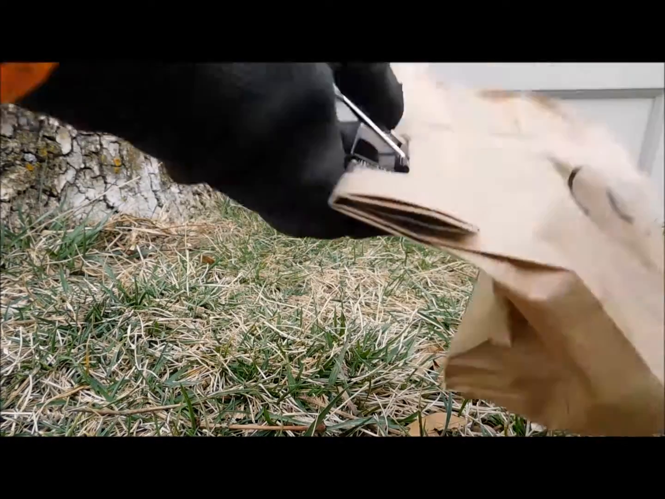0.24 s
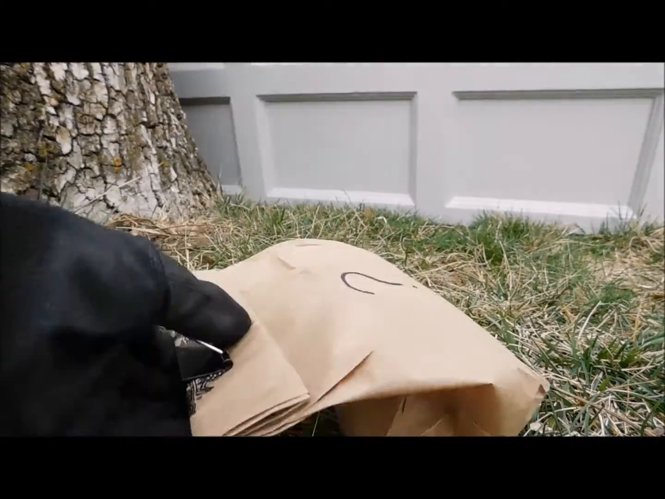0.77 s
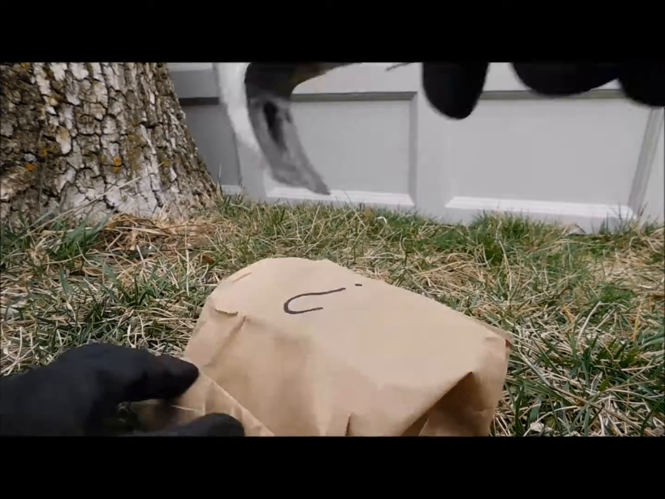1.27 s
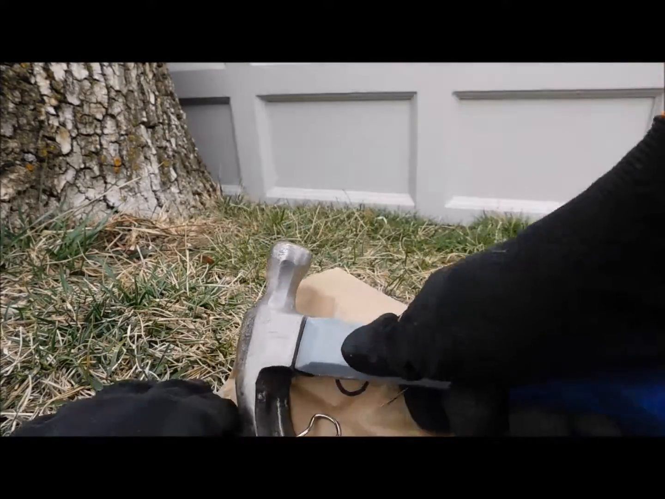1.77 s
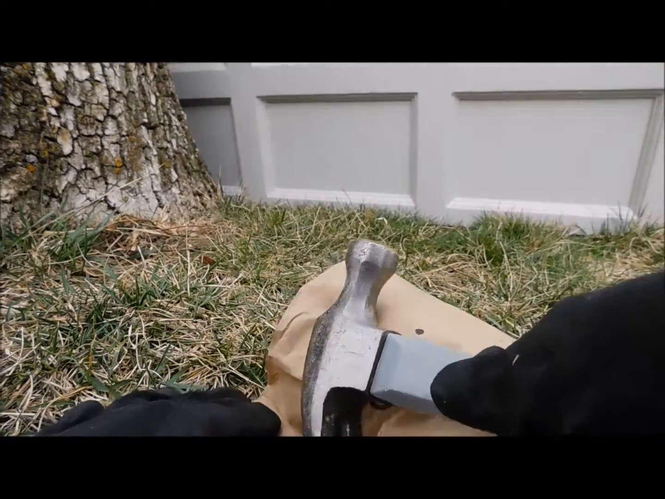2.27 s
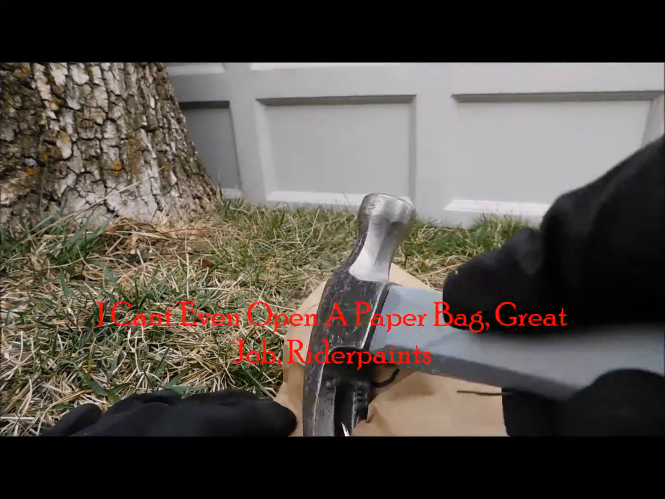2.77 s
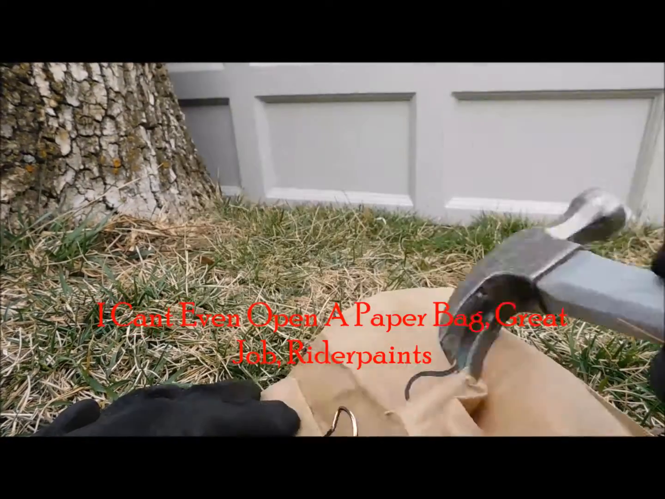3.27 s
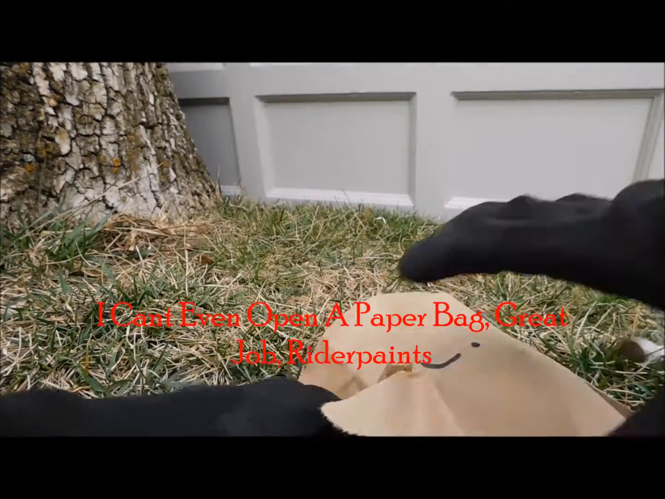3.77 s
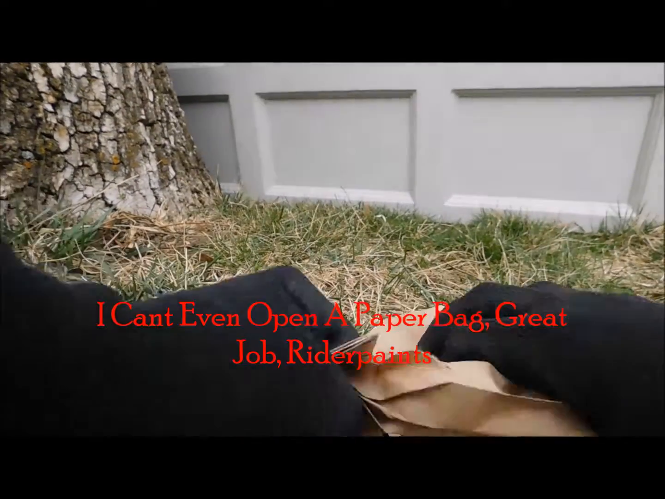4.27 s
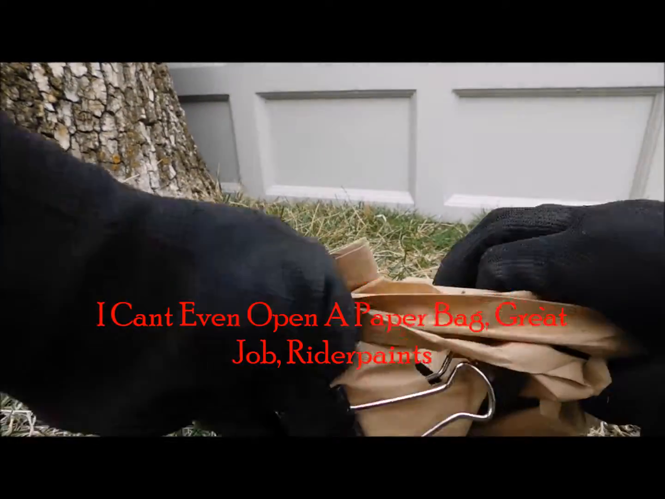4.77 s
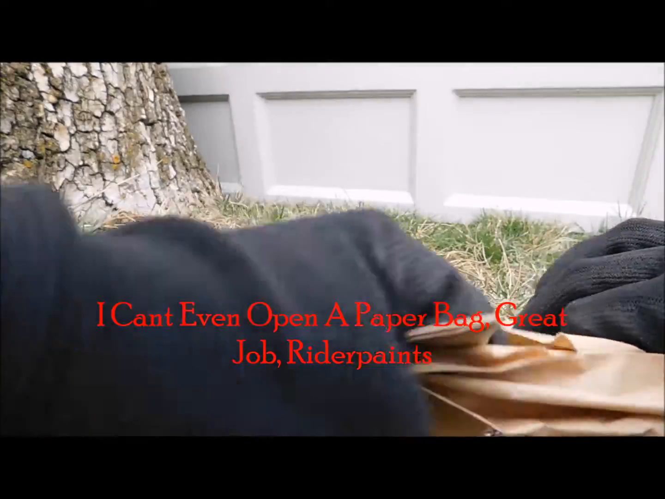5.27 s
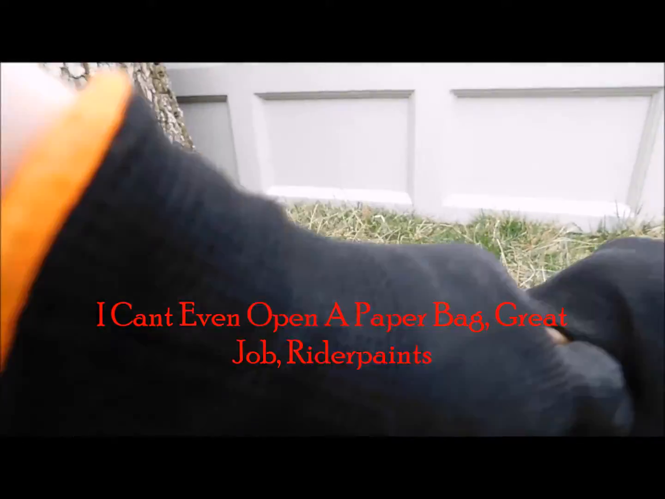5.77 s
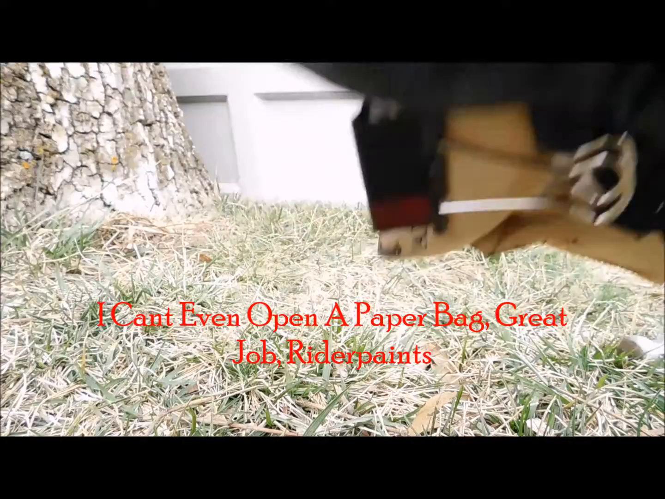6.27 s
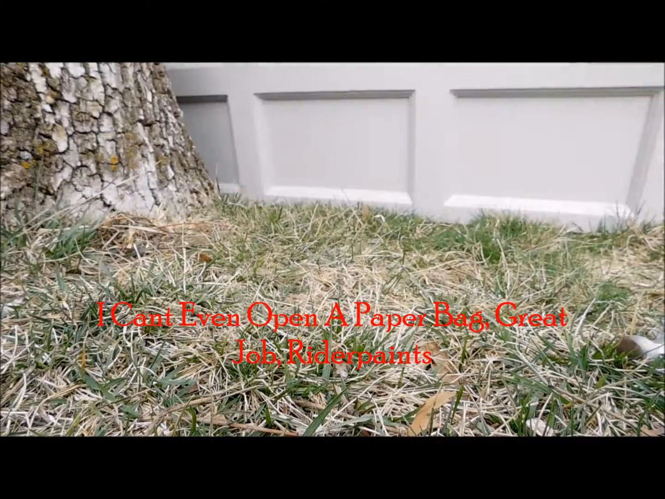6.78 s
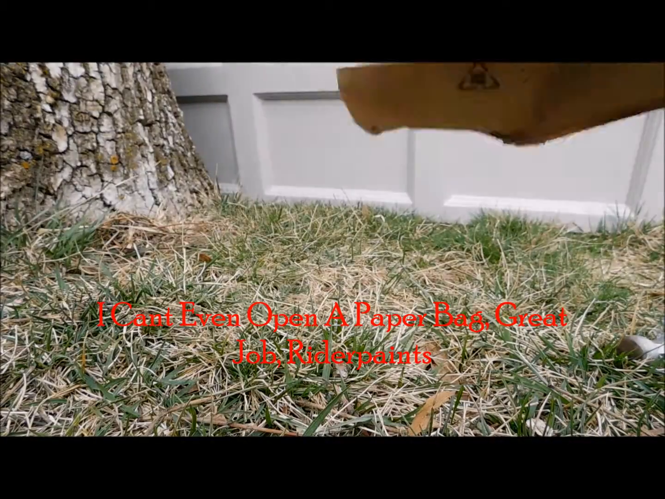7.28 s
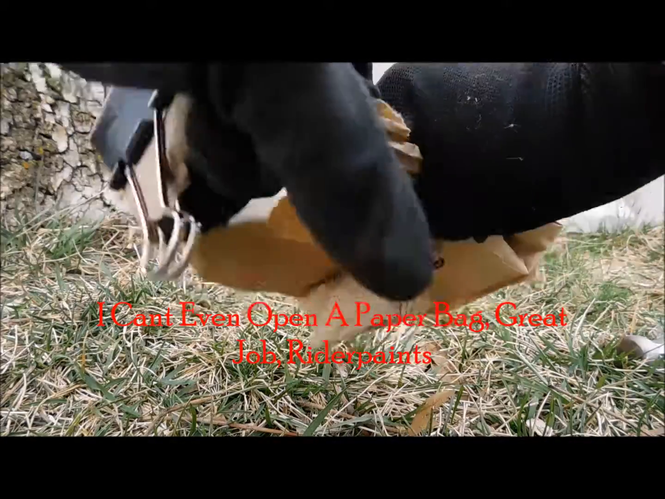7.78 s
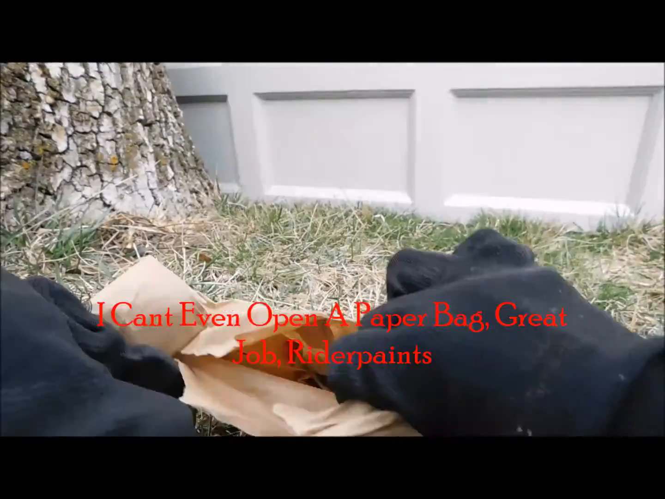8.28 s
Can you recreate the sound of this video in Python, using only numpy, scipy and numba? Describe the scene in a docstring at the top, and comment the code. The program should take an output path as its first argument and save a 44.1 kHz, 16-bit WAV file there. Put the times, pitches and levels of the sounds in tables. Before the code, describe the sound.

Dry, irregular paper crackle dominates, recorded very near and outdoors. Brief bursts of rustling and creasing come with clear panel snaps, fibre ticks and dull low thumps from the bag's walls. It is strongest during the hammer pulls, thins to light fumbling mid-way, nearly stops, then becomes loud and snappy again. Faint hiss and occasional soft wind rumble sit underneath, and the bag sits slightly right of centre.

```python
"""A stiff paper bag on a lawn is crumpled, pulled and torn by gloved hands and a hammer claw.
Dense crackle is many small random creases plus rubbing noise; clear snaps are timed panel rings,
rattles and fibre ticks; popping or knocked walls thump.
Light wind is low-passed noise rumbling on two microphone ports of a small camera; the yard and
microphone add steady hiss."""
import sys
import numpy as np
from scipy import signal
from scipy.fft import rfft, irfft, next_fast_len
from scipy.io import wavfile
from scipy.ndimage import uniform_filter1d, map_coordinates
from numba import njit

SR = 44100
rng = np.random.default_rng(int(sys.argv[2]) if len(sys.argv) > 2 else 0)


def store_pcm(level_fs):
    """Save levels as 16-bit WAV."""
    pcm = np.round(np.clip(level_fs, -1, 1) * 32767).astype(np.int16)
    wavfile.write(sys.argv[1], SR, np.atleast_2d(pcm).T)


N = 376173


def gain_of(db):
    """Decibels to amplitude gain."""
    return 10 ** (np.asarray(db) / 20)


def evened(x):
    """Scales to rms 1."""
    return x / np.sqrt(np.mean(x ** 2) + 1e-20)


def read(points, hz):
    """Interpolates a spectrum table on a log frequency axis."""
    f, value = np.transpose(points)
    return np.interp(np.log(hz + 1), np.log(f + 1), value)


def follow(table):
    """One value per sample for each column of a time table."""
    s, *columns = np.transpose(table)
    return [np.interp(np.arange(N) / SR, s, c) for c in columns]


def colour(x, points):
    """Minimum-phase filter with the given spectrum shape, scaled to energy 1."""
    log_gain = np.log(gain_of(read(points, abs(np.fft.fftfreq(4096, 1 / SR)))))
    response = np.exp(np.conj(signal.hilbert(log_gain)))
    taps = np.fft.ifft(response).real[:2048]
    taps = taps / np.linalg.norm(taps)
    return signal.oaconvolve(x, taps[None], axes=1)[:, :x.shape[1]]


def drift(per_s):
    """Twice-averaged noise: a slow random drift, rms 1."""
    width = max(round(SR / per_s), 1)
    return evened(uniform_filter1d(uniform_filter1d(rng.standard_normal(N), width), width))


EDGE_DB, ROUNDNESS = -10, 1.9  # level at start and end re peak; shape: 1 pointed, 2 rounded


def swells(rows, rest, step=64):
    """Sums swell powers over a resting level; further columns blend by each swell's share of power."""
    t = np.arange(0, N, step) / SR
    rows = np.array(rows)
    start, peak, end, level_db = rows[:, :4].T[:, :, None]
    away = np.where(t < peak, (peak - t) / (peak - start), (t - peak) / (end - peak))
    swell_db = level_db + EDGE_DB * abs(away) ** ROUNDNESS
    power = gain_of(2 * np.vstack([swell_db, rest[0] + 0 * t]))
    total = power.sum(0)
    blends = np.vstack([rows[:, 4:], rest[1:]]).T @ power / total
    return [np.interp(np.arange(N) / SR, t, c) for c in [10 * np.log10(total), *blends]]


def burst(t60_s, rise_s=0.00014):
    """Two draws of a decaying puff of noise, energy 1 each."""
    t = np.arange(1024) / SR
    x = rng.standard_normal((2, 1024)) * gain_of(-60 * t / t60_s) * (1 - np.exp(-t / rise_s))
    return x / np.linalg.norm(x, axis=1, keepdims=True)


def panel(hz, cycles, rise_s=0.00019, loss_per_s=250):
    """A buckling paper panel rings as a damped sine, energy 1."""
    t = np.arange(1024) / SR
    decay = np.exp(-t * (hz / cycles + loss_per_s))
    x = np.sin(2 * np.pi * hz * t) * decay * (1 - np.exp(-(t / rise_s) ** 2))
    return x / np.linalg.norm(x)


@njit
def add(mix, size, at, sound):
    """Adds the sound at each given sample, scaled by its size."""
    for i in at:
        n = min(sound.shape[1], mix.shape[1] - i)
        for c in range(2):
            for j in range(n):
                mix[c, i + j] += size[i] * sound[c, j]


LARGE_DB, LARGE_DB_PER_OCTAVE = 5.5, -9  # large-panel boost at typical ring 1500 Hz; slope with ring


def folded(x, typical_hz, patchy_db=1.5, large_hz=1000):
    """The bag's shape colours its sound: large panels lift the lows, random resonances drift."""
    hz, t, z = signal.stft(x, SR, nperseg=256, noverlap=192)
    typical_hz = typical_hz[np.minimum((t * SR).astype(int), N - 1)]
    large_db = LARGE_DB + LARGE_DB_PER_OCTAVE * np.log2(typical_hz / 1500)
    patches = rng.standard_normal(z.shape[1:])
    patches = uniform_filter1d(patches, size=2, axis=0)
    patches = evened(uniform_filter1d(patches, size=80, axis=1))
    large = 1 / (1 + (hz[:, None] / large_hz) ** 4)
    z = z * gain_of(patchy_db * patches + large_db * large)
    return signal.istft(z, SR, nperseg=256, noverlap=192)[1][:, :N]


# squeezes, pulls, folds: (start [s], peak [s], end [s], crackle level [dB], treble re body [dB])
MOVES = [(-0.089, 0.0, 0.22, -40, -9), (0.08, 0.093, 0.136, -31.5, -4.5), (0.13, 0.17, 0.211, -26, -2),
         (0.166, 0.242, 0.258, -27.5, -9), (0.286, 0.346, 0.372, -31, -4), (0.355, 0.413, 0.5, -30, -8.5),
         (0.563, 0.658, 0.679, -36, -9), (0.825, 0.858, 0.885, -34, -2.5), (0.776, 0.932, 0.987, -41, -9),
         (0.988, 1.039, 1.098, -39.5, -12), (1.17, 1.238, 1.3, -40.5, -8), (1.318, 1.34, 1.371, -28, -9),
         (1.37, 1.4, 1.44, -31, -4.5), (1.44, 1.495, 1.561, -24.5, -9.5), (1.45, 1.601, 1.644, -38.5, -16),
         (1.697, 1.794, 1.871, -28.5, -9.5), (1.929, 1.984, 2.023, -26.5, -6),
         (2.045, 2.117, 2.161, -22, -3.5), (2.213, 2.244, 2.281, -34.5, -8),
         (2.321, 2.356, 2.39, -29, -4.5), (2.427, 2.445, 2.512, -32, -1.5),
         (2.494, 2.568, 2.607, -26.5, -4), (2.472, 2.674, 2.748, -35.5, -6.5),
         (2.824, 2.89, 2.918, -30.5, -6.5), (2.972, 3.015, 3.072, -20, -6), (3.15, 3.213, 3.299, -24.5, 1),
         (3.336, 3.365, 3.415, -24, -4), (3.62, 3.655, 3.697, -38.5, -8), (3.72, 3.79, 3.894, -45, 0),
         (3.898, 3.921, 3.953, -27.5, -6.5), (3.94, 4.01, 4.31, -35.5, -6.5),
         (4.135, 4.17, 4.217, -26.5, -8), (4.211, 4.26, 4.313, -29.5, -4), (4.306, 4.345, 4.387, -29, -7.5),
         (4.414, 4.433, 4.48, -28.5, -2.5), (4.481, 4.58, 4.653, -31.5, -8.5),
         (4.667, 4.73, 4.82, -37.5, -4.5), (4.848, 4.887, 5.012, -34.5, -2), (4.9, 5.06, 5.13, -32.5, -1),
         (5.161, 5.181, 5.203, -34.5, -0.5), (5.23, 5.38, 5.459, -34, -4.5),
         (5.43, 5.487, 5.543, -32, -2.5), (5.57, 5.632, 5.646, -36, -4.5), (5.709, 5.803, 5.815, -31.5, -9),
         (5.602, 5.902, 5.97, -31, -3), (6.132, 6.215, 6.235, -47.5, -25),
         (6.258, 6.292, 6.329, -33.5, -14), (6.345, 6.372, 6.389, -40, -19),
         (6.404, 6.432, 6.455, -38.5, -12), (6.479, 6.513, 6.552, -34, -4.5),
         (6.605, 6.66, 6.678, -35.5, -8), (6.679, 6.691, 6.736, -37, -6), (6.805, 6.865, 6.94, -21.5, -2.5),
         (7.04, 7.093, 7.189, -27.5, -3), (7.288, 7.335, 7.398, -21.5, -3.5), (7.41, 7.434, 7.482, -30, -7),
         (7.515, 7.572, 7.638, -27, -6), (7.65, 7.672, 7.73, -27.5, -2.5), (7.817, 7.829, 7.848, -24.5, -7),
         (7.61, 7.8, 7.998, -33, -7), (8.002, 8.03, 8.122, -26, -8.5), (8.149, 8.242, 8.26, -34, -2.5),
         (8.383, 8.411, 8.45, -23.5, -1.5), (8.265, 8.47, 8.77, -30.5, -4)]
# hands lying on the bag between moves: (level [dB], treble re body [dB])
HANDS_AT_REST = (-48.5, -7)
# panels shrink as the bag is crushed, grow as it is opened: (time [s], typical ring [Hz])
PANEL_RINGS = [(0.0, 1762), (0.6, 1473), (1.55, 1403), (1.95, 1761), (2.85, 1842), (3.05, 2427),
               (3.9, 1862), (4.6, 1722), (5.1, 1869), (5.85, 1594), (6.2, 2070), (6.85, 2494), (7.35, 2082),
               (7.7, 2464), (8.03, 1445), (8.53, 1710)]
# paper panels: (frequency [Hz], level [dB])
BODY_SPECTRUM = [(150, -30.5), (400, -13.5), (800, -4), (1300, -3.5), (2500, -1.5), (4000, -5.5),
                 (6000, -20.5), (9000, -35)]
# breaking fibres: (frequency [Hz], level [dB])
FIBRE_SPECTRUM = [(2500, -26), (4500, 2.5), (6000, 0), (10000, -2), (14000, -3), (17000, -12.5)]
# whole walls of the bag: (frequency [Hz], level [dB])
WALL_SPECTRUM = [(80, -16.5), (150, -3.5), (300, 0.5), (500, -7), (800, -18.5)]
# wall boom: level for a -36 dB move at 1500 Hz ring; share of the move's dB; slope with ring
BOOM_DB, BOOM_FOLLOW, BOOM_DB_PER_OCTAVE = -49, 0.73, -6.5


def crackle(count=24):
    """Small creases give way in clumps, more often under harder handling; each kind rings its panel."""
    level_db, crisp_db = swells(MOVES, HANDS_AT_REST)
    typical_hz, = follow(PANEL_RINGS)
    per_s = 900 * gain_of(.55 * (level_db + 34.5) + 4.0 * drift(60))
    chance, tail = rng.random((2, N))
    size = gain_of(5.14 * np.minimum(-np.log(tail + 1e-9), 3.3)) * (chance < per_s / SR)
    # offset the power gained from denser creases
    size = evened(size / np.sqrt(uniform_filter1d(per_s, round(0.09 * SR))))
    size_crisp = size * gain_of(4.5 * rng.standard_normal(N))  # some break fibres, others only bend

    rings_hz = np.geomspace(450, 4200, count)
    wanted_hz = typical_hz * 2 ** (.9 * rng.standard_normal(N))
    kind = np.clip(np.searchsorted(rings_hz, wanted_hz), 0, count - 1)
    body, crisp, boom = np.zeros((3, 2, N))
    for k, hz in enumerate(rings_hz):
        t60_s = rng.uniform(0.002, 0.024)
        side = (-1) ** k * 0.18
        ring = 0.54 * panel(hz, 2.9) * [[1], [side]] + 0.95 * burst(t60_s)
        at = np.flatnonzero((size > 0) & (kind == k))
        add(body, size, at, ring)
        add(crisp, size_crisp, at, burst(.3 * t60_s))
        add(boom, size, at, burst(5 * t60_s, 0.0008))

    # gloves and paper sliding
    rub = gain_of(-2.5 + 5.05 * drift(45)) * rng.standard_normal((2, 2, N))
    body = folded(colour(evened(body) + rub[0], BODY_SPECTRUM), typical_hz)
    crisp = colour(evened(crisp) + gain_of(-2.5) * rub[1], FIBRE_SPECTRUM)
    boom = colour(boom, WALL_SPECTRUM)
    boom_db = BOOM_DB + BOOM_FOLLOW * (level_db + 36.0)
    boom_db = boom_db + BOOM_DB_PER_OCTAVE * np.log2(typical_hz / 1500)
    body = gain_of(level_db) * evened(body)
    crisp = gain_of(level_db + crisp_db) * evened(crisp)
    return body + crisp + gain_of(boom_db) * evened(boom)


# gusts; start and end are the EDGE_DB points, fall time is |end - peak|:
# (start [s], peak [s], end [s], level [dB])
GUSTS = [(-.1, 0.02, 0.79, -42), (1.2, 1.45, 1.85, -41), (1.6, 1.8, 5.7, -59), (4.45, 4.77, 4.95, -52),
         (5.2, 5.8, 5.52, -52), (6.92, 7.06, 7.13, -52), (8.27, 8.42, 8.7, -45)]
# wind rumble: (frequency [Hz], level [dB])
WIND_SPECTRUM = [(12, -16), (25, 2), (65, -3), (90, -3.5), (200, -16.5), (400, -42)]
CALM_DB = -58.5


def wind():
    """Lumpy pressure noise, partly unrelated at the two ports and stronger at the right one."""
    a, b = colour(rng.standard_normal((2, N)), WIND_SPECTRUM)
    pair = np.array([a + .8 * b, (a - .8 * b) * gain_of(4)])
    level_db, = swells(GUSTS, [CALM_DB])
    return gain_of(level_db + 2.5 * drift(6)) * evened(pair)


# left-right likeness: (frequency [Hz], correlation [0-1])
PORT_LIKENESS = [(60, 0.6), (250, 0.58), (550, 1), (1650, 0.53), (4970, 0.43), (15000, 0)]
# the camera body shades the left port's treble: (frequency [Hz], left re right [dB])
BODY_SHADE = [(700, 1.5), (15000, -2)]


def ports(pair):
    """Mixes two unrelated sounds to the ports: likeness and level difference vary with frequency."""
    n = next_fast_len(N)
    hz = np.fft.rfftfreq(n, 1 / SR)
    a, b = rfft(pair, n)
    half = np.arccos(np.clip(read(PORT_LIKENESS, hz), 0, 1)) / 2
    shade = gain_of(read(BODY_SHADE, hz) / 2)
    left = (a * np.cos(half) + b * np.sin(half)) * shade
    right = (a * np.cos(half) - b * np.sin(half)) / shade
    return irfft([left, right], n)[:, :N]


# yard and microphone hiss: (frequency [Hz], level [dB])
AIR_SPECTRUM = [(59, -29), (100, -29), (322, 6), (736, 16), (2080, 5.5), (6290, -3), (11200, 3),
                (16000, -14)]
AIR_DB = -56.5


def air():
    """Steady coloured noise: hiss of the yard and the microphone."""
    return gain_of(AIR_DB) * ports(colour(rng.standard_normal((2, N)), AIR_SPECTRUM))


# a wall pops in or out, or is knocked: (time [s], relative level [dB], ring [Hz])
THUMPS = [(0.084, -35.5, 224), (0.645, -34, 225), (1.369, -25, 320), (1.383, -26, 229), (1.428, -26.5, 85),
          (1.456, -27.5, 200), (2.755, -34, 340), (2.99, -28.5, 393), (6.207, -36.5, 368),
          (8.407, -31.5, 454)]


def thumps():
    """Each moving wall gives a heavily damped low ring, fed to the first of the two mixed sounds."""
    mix = np.zeros((2, N + 1024))
    for s, db, hz in THUMPS:
        start = round(s * SR)
        mix[0, start:start + 1024] += gain_of(db + 23.0) * panel(hz, 0.81, 0.0014, 30)
    return mix[:, :N]


# clear creases: (peak time [s], relative level [dB], panel ring [Hz], crispness [dB])
SNAPS = [(0.105, -23, 1370, -10), (0.5892, -27.5, 1265, 3), (0.758, -29.5, 1490, -8.5),
         (0.8326, -24, 1110, -24), (0.8494, -23.5, 1760, -12), (0.9392, -25, 800, -9.5),
         (0.988, -28, 730, -25), (1.0296, -26, 1460, -15), (1.0508, -25.5, 1370, -10.5),
         (1.2343, -24.5, 940, -5.5), (1.247, -18.5, 1350, -12), (1.316, -25, 900, -12),
         (1.3457, -18.5, 1430, -30), (1.3525, -17.5, 1410, -10), (1.427, -22, 1020, -10.5),
         (1.4557, -18, 1320, -5), (1.4731, -15, 1400, -16), (1.5136, -17, 1120, -24),
         (1.5227, -16, 1450, -8.5), (1.558, -18.5, 1680, -17), (1.594, -26.5, 1420, -2),
         (1.6517, -27, 2900, -15), (1.7209, -17.5, 1300, -15), (1.784, -13.5, 1300, -12),
         (1.7304, -25, 3000, -8), (1.835, -18.5, 2490, -10.5), (1.8603, -17.5, 2020, -13.5),
         (1.9561, -16.5, 2080, -12), (1.968, -23, 2100, -2), (2.137, -18.5, 865, -12),
         (2.2287, -29.5, 980, -16), (2.25, -27.5, 1100, 0.5), (2.308, -32.5, 2100, -8),
         (2.333, -24, 2330, -14), (2.3589, -11.5, 2550, -10.5), (2.5597, -17.5, 1780, -8),
         (2.7613, -14, 4030, -10.5), (2.8333, -24.5, 1770, -5.5), (2.877, -22, 2390, -27),
         (2.9904, -13, 2000, -9), (3.077, -27, 2600, -18), (3.091, -24.5, 2200, -18),
         (3.2675, -21, 4500, -16), (3.3405, -17.5, 2130, -7), (3.3873, -21, 3320, -15),
         (3.406, -21, 1780, -24), (3.495, -31, 2350, -5.5), (3.568, -34, 1700, -17),
         (3.582, -38, 1980, -14), (3.6269, -30, 1240, -34), (3.668, -28, 1590, -27),
         (3.909, -26, 2540, -33), (3.9149, -18, 2700, -26), (3.995, -23.5, 1480, -16),
         (4.031, -26, 2500, -21), (4.054, -24.5, 870, -20), (4.0827, -22, 3550, -8.5),
         (4.1376, -20, 3360, -9), (4.1808, -17.5, 2470, -24), (4.2995, -22, 1280, -3.5),
         (4.3275, -19, 3800, -17), (4.3385, -18.5, 2630, -8), (4.418, -20.5, 2270, -12),
         (4.4857, -20.5, 2570, -13), (4.526, -27, 1400, -14), (4.577, -17.5, 1330, -16),
         (4.600, -24, 650, -20), (4.623, -21, 2460, -12), (4.6775, -24, 2220, -15), (4.7, -21.5, 2510, -13),
         (4.715, -16, 2500, -11), (4.7467, -28.5, 950, -3.5), (4.797, -30.5, 4000, -10),
         (4.82, -30, 1430, -15), (4.8488, -28.5, 1350, -9), (4.8754, -28, 1530, -15),
         (4.919, -26.5, 1380, -1), (4.951, -26, 1280, -14), (4.981, -28, 895, -22), (5.0017, -31, 2430, 4),
         (5.0715, -31, 2660, 1), (5.1286, -26.5, 730, -4), (5.167, -32, 2540, -4), (5.2527, -28, 2290, -5),
         (5.274, -32.5, 735, -19), (5.3048, -41, 3470, 3), (5.482, -24, 3150, 1.5), (5.616, -35, 1640, -15),
         (5.709, -26.5, 2440, -14), (5.763, -25.5, 1460, -11), (5.842, -24.5, 1780, -13),
         (6.005, -32, 2580, -3.5), (6.0844, -34, 2190, -14), (6.212, -28, 1420, -9),
         (6.293, -20.5, 1370, -11), (6.338, -29, 1720, -12), (6.3621, -24, 1600, -21),
         (6.3772, -24.5, 2120, -7), (6.5382, -28.5, 1630, -13), (6.602, -24, 1580, -6.5),
         (6.6703, -22, 1240, -23), (6.704, -14.5, 1580, -13), (6.744, -26, 2320, -15),
         (6.7848, -21, 4380, -7), (6.7974, -15.5, 2220, -9), (6.816, -10, 2520, -15),
         (6.9388, -21, 2270, -20), (6.9665, -36, 1490, -12), (7.106, -27, 2180, -7),
         (7.162, -20.5, 2900, -11), (7.1802, -23, 3380, -2.5), (7.263, -25.5, 4660, -2),
         (7.2775, -27, 2330, -4), (7.3176, -10.5, 2100, -7), (7.387, -14, 1380, -15),
         (7.4517, -24, 1340, -19), (7.625, -23, 1570, -25), (7.7027, -11, 2500, -12),
         (7.736, -24, 4440, -2), (7.7495, -26, 4460, -7), (7.755, -24.5, 780, -10), (8.019, -17, 1380, -24),
         (8.0274, -16, 1100, -21), (8.121, -20, 1630, -15), (8.238, -19.5, 1180, -11),
         (8.4673, -19.5, 3170, -13), (8.503, -26, 3010, 0), (8.51, -17.5, 960, -12)]


def snaps():
    """Each crease: a sharp crack, a ring of its panel, a softer rattle and a tick of fibres."""
    ring, rattle, tick = np.zeros((3, 2, N + 1024))
    lead_s, strain_s = .0005, .0014
    crack_db, ring_db, rattle_db, tick_db = 17, 9.5, 6.5, 23.5
    rattle_follow = .7  # strong creases rattle relatively less
    strain = round(strain_s * SR)
    for s, db, hz, crisp_db in SNAPS:
        start = round((s - lead_s) * SR)
        at = slice(start, start + 1024)
        crack = gain_of(db + crack_db) * panel(hz, 1.1, .00012)
        longer_ring = gain_of(db + ring_db) * panel(hz, 6.4, 0.00058)
        ring[:, at] += (crack + longer_ring) * [[1], [rng.uniform(-0.47, 0.36)]]
        early = slice(start - strain, start - strain + 1024)  # paper strains just before it gives
        rattle[:, early] += gain_of(rattle_follow * db + rattle_db) * burst(.011, strain_s)
        fibres = burst(.003, .0001) + .45 * burst(0.016, 0.0032)
        tick[:, at] += gain_of(db + crisp_db + tick_db) * fibres
    return (ring + colour(rattle, BODY_SPECTRUM) + colour(tick, FIBRE_SPECTRUM))[:, :N]


# place of the bag: (time [s], left re right [dB])
BAG_PLACE = [(0.0, -4), (1.0, 0), (4.2, -1.5), (5.0, -3), (6.8, -3), (7.29, 0), (7.43, -3), (7.91, -1),
             (8.53, 0)]
LAG_SAMPLES, LAG_SAMPLES_PER_DB = 1.14, -0.67  # left port lags more with the bag on the right


def bag():
    """All paper sounds, placed by level and by a small delay at the left port."""
    pan_db, = follow(BAG_PLACE)
    lag_samples = LAG_SAMPLES + LAG_SAMPLES_PER_DB * pan_db
    left, right = ports(crackle() + thumps() + snaps())
    left = map_coordinates(left, [np.arange(N) - lag_samples], order=3)
    return np.array([left * gain_of(pan_db / 2), right * gain_of(-pan_db / 2)])


def scene():
    """Bag, wind and air."""
    return bag() + wind() + air()


EDGE_HZ = 16050


def record(dry):
    """Low-pass at the camera's band limit."""
    taps = signal.firwin(401, EDGE_HZ, window=("kaiser", 9), fs=SR)
    return signal.oaconvolve(dry, taps[None], "same", axes=1)


dry = scene()
out = record(dry)
store_pcm(out)
```